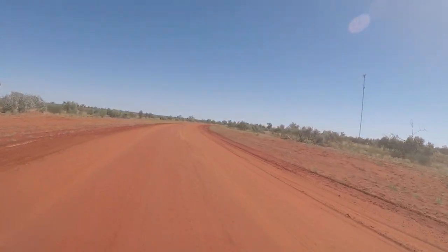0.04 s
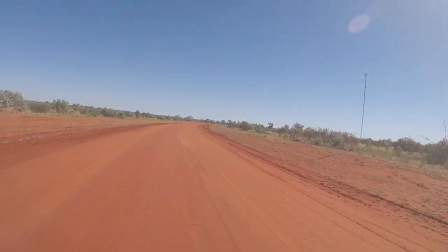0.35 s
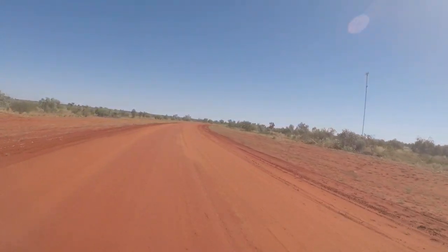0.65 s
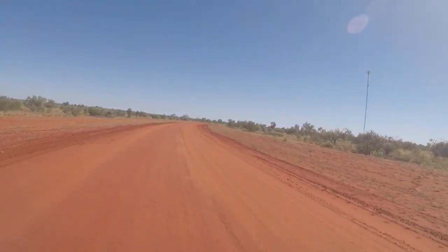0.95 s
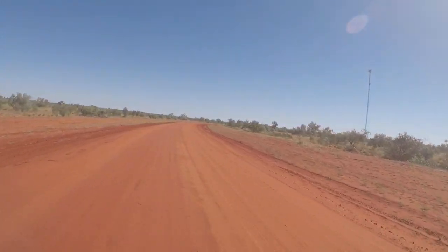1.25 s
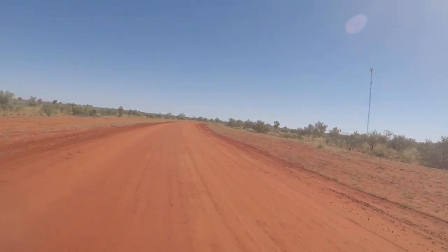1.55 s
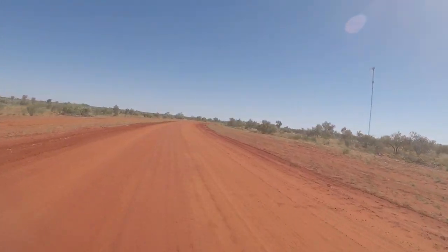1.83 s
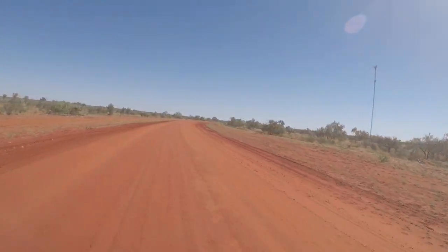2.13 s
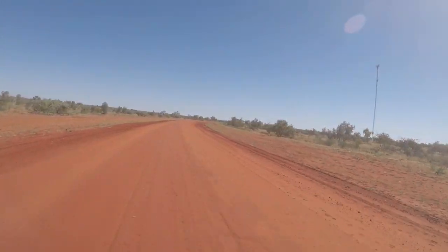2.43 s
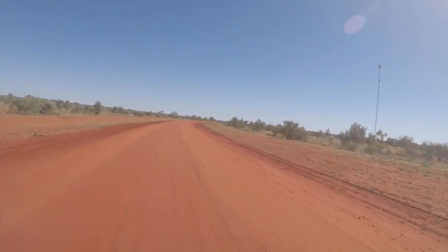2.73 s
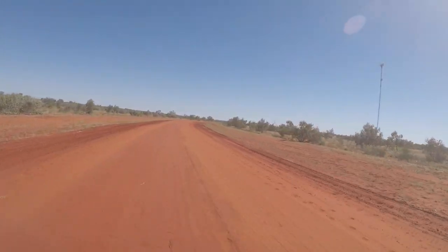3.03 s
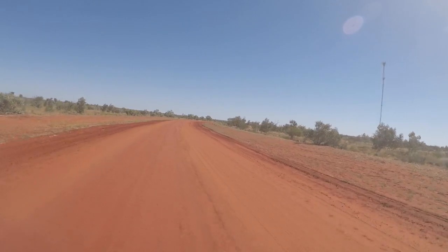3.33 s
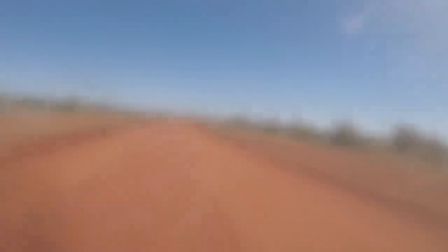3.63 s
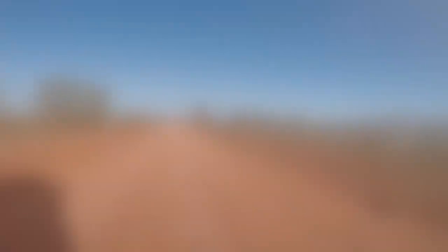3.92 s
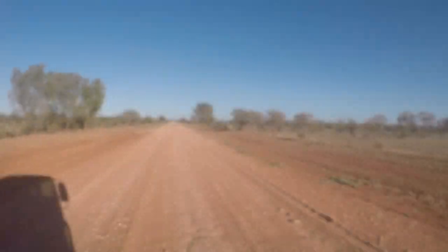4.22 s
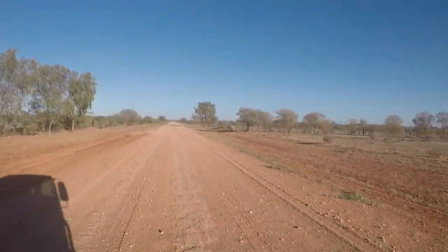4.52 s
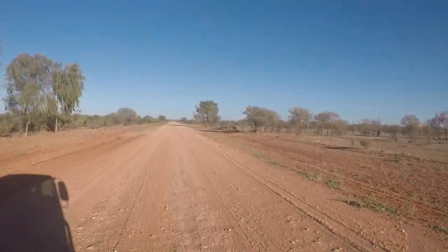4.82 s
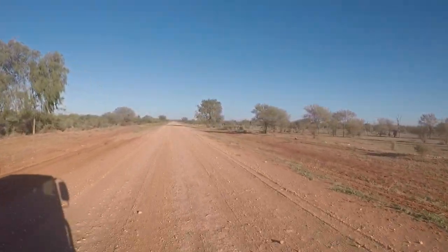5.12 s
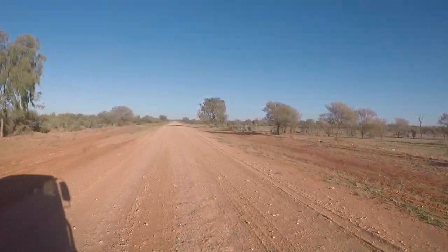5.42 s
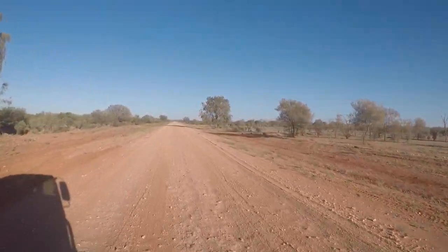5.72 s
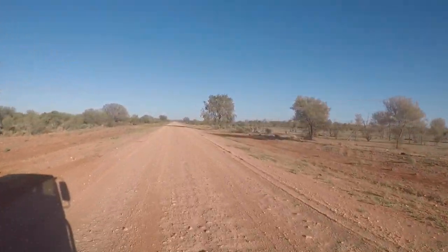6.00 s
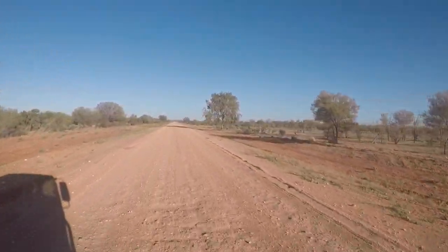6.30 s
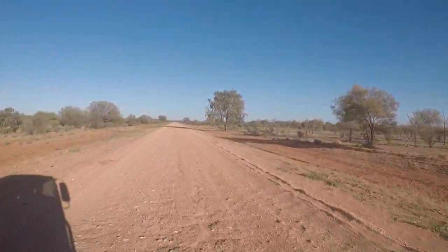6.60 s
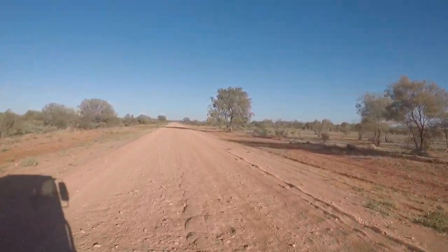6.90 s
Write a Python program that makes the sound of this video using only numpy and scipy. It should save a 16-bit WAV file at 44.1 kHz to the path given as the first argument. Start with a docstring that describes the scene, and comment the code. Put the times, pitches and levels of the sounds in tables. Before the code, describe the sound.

Deep, continuous tyre rumble and air rush from a vehicle driving on sand, then on gravel with bursts of rattling knocks.

```python
"""Four-wheel drive from sand to gravel

Heard from the front of the vehicle, first on smooth sand, then on corrugated gravel. The tyres shake
the body into a deep boom and a roar, air rushes past, a bar hums and the drivetrain whines faintly.
On the gravel a loose fitting knocks in bursts and grit ticks against the bodywork."""
import sys
import numpy as np
from scipy import signal
from scipy.fft import rfft, irfft, next_fast_len
from scipy.io import wavfile
from scipy.ndimage import uniform_filter1d, minimum_filter1d, map_coordinates

SR = 44100
rng = np.random.default_rng(int(sys.argv[2]) if len(sys.argv) > 2 else 0)


def master_out(mix):
    """Clip the mix to full scale and print it as 16-bit PCM to the path in sys.argv[1]."""
    frames = np.transpose(np.atleast_2d(mix))
    ceiling = np.clip(frames, -1, 1)
    pcm = np.round(ceiling * 32767).astype(np.int16)
    wavfile.write(sys.argv[1], SR, pcm)


N = 306495
NOW = np.arange(N) / SR
CENTRE = np.array([[1], [0]])  # sources are (mid, side) pairs

# how hard road and air work on the vehicle: time_s, level_db
RUSH = [(0.0, -28.5), (0.71, -30), (1.66, -28.5), (2.09, -31.5), (2.92, -31.5), (3.52, -30.5), (4.1, -37),
        (5.07, -39), (5.98, -37), (6.21, -37), (6.81, -34.5), (6.95, -33.5)]
# rough patches of road: centre_s, half_length_s, rise_db
ROUGH_PATCHES = [(.03, 0.11, 3.5), (.48, 0.12, 3), (1.95, 0.035, 4.5), (2.53, 0.14, 5), (3.03, 0.1, 4.5),
                 (3.28, 0.061, 5.5), (6.55, 0.041, 4), (6.85, 0.14, 1.5)]
# jolts that knock the loose fitting: time_s, level_db, ring_db
KNOCKS = [(4.0916, -18.5, -1), (4.1668, -16.5, -15), (4.361, -11.5, -2.5), (4.4455, -15.5, -10),
          (4.7339, -16, 2), (4.78, -34, 6), (4.7924, -13, -20), (4.9907, -21, -10), (5.1252, -21, 3),
          (5.2073, -9, 0.5), (5.247, -26, -8), (5.2824, -21, -19), (5.4465, -27.5, 0), (5.4711, -16, -5),
          (5.5467, -13.5, -14), (5.6169, -18.5, 5), (5.9859, -19.5, -5), (6.0443, -22, 2),
          (6.0673, -9, 2.5), (6.127, -27, 6), (6.1465, -8.5, 1), (6.22, -16.5, -4), (6.3293, -16.5, 0),
          (6.4059, -7, 5), (6.4794, -13.5, -14), (6.7576, -8, 2), (6.8391, -13, -18), (6.9127, -23, 3)]


def amp(db):
    """Decibels to gain."""
    return 10 ** (np.asarray(db) / 20)


def along(points, hz):
    """Read (freq_hz, value) points on a log axis."""
    freqs, values = np.transpose(points)
    return np.interp(np.log(hz + 1), np.log(freqs + 1), values)


def curves(rows):
    """One automation curve for each column after the time."""
    times, *columns = np.transpose(rows)
    return [np.interp(NOW, times, column) for column in columns]


def swells(rows):
    """Bell-shaped swells from (centre_s, half_length_s, height) rows."""
    return sum(height * np.exp(-.5 * ((NOW - s) / length) ** 2) for s, length, height in rows)


def wobble(rate):
    """A smooth random curve, rate knots a second."""
    return map_coordinates(rng.standard_normal(int(N * rate / SR) + 4), [NOW * rate])


def filtered(x, response):
    """Equalise x by a gain that depends on frequency."""
    size = next_fast_len(N + SR // 2)
    return irfft(rfft(x, size) * response(np.fft.rfftfreq(size, 1 / SR)), size)[..., :N]


def coloured(x, spectrum):
    """Give a pair this spectrum, rolled off beyond its ends; the mid has rms 1."""
    # stereo spread, side relative to mid: freq_hz, side_db
    spread = [(25, -24.5), (50, -19.5), (70, -6), (100, -17), (160, 1), (210, -1.5), (330, -8.5), (550, -4),
              (850, 5.5), (1500, -1.5), (2700, -4), (4200, -3.5), (5200, 1), (9000, 1)]
    lo, hi = spectrum[0][0], spectrum[-1][0]

    def response(hz):
        skirts = np.minimum(hz / lo, 1) ** 2 / np.maximum(hz / hi, 1) ** 4
        return skirts * amp(along(spectrum, hz) + [0 * hz, along(spread, hz)])

    pair = filtered(x, response)
    return pair / np.std(pair[0])


def noise(spectrum):
    """Mid and side noise with this spectrum."""
    return coloured(rng.standard_normal((2, N)), spectrum)


def grains(rate, spectrum):
    """Tiny impacts of random size, rate a second; each skitters briefly."""
    size_spread_db, skitter_s = 5, 0.0015
    energy = (rng.random(N) < rate / SR) * amp(size_spread_db * rng.standard_normal(N)) ** 2
    skitter = signal.lfilter([1], [1, -np.exp(-2 / (skitter_s * SR))], energy)
    return coloured(np.sqrt(skitter) * rng.standard_normal((2, N)), spectrum)


def tone(hz, db):
    """A centred sine of this pitch and rms level."""
    return np.sqrt(2) * amp(db) * np.sin(2 * np.pi * np.cumsum(hz) / SR) * CENTRE


def evened(vibration, evenness):
    """Even out the swings of a low vibration so its level holds steady; the mid has rms 1."""
    mid, side = vibration / np.std(vibration[0])
    envelope = np.abs(signal.hilbert(mid, next_fast_len(N)))[:N]
    swing = uniform_filter1d(envelope, size=SR // 30)
    mid = mid / (swing + 0.39) ** evenness
    return np.array([mid / np.sqrt(np.mean(mid ** 2)), side])


def on_road(sand, gravel):
    """Equal-power crossfade between the two surfaces."""
    # ground under the tyres: time_s, gravel_share
    surface = [(0, 0.05), (3.5, 0.1), (4.15, 0.88), (6.95, 0.89)]
    share, = curves(surface)
    return np.sqrt(1 - share) * sand + np.sqrt(share) * gravel


def effort():
    """The rush in dB above its average."""
    rush_db, = curves(RUSH)
    return rush_db - rush_db.mean()


def lurching():
    """Tyre load in dB: lurches press the tread into the gravel, rebounds lift it."""
    # lurches and rebounds: centre_s, rise_db
    lurches = [(4.25, -3.5), (4.42, 4), (4.65, -2.5), (4.77, 6.5), (4.92, 1.5), (5.05, -4.5), (5.2, -1),
               (5.52, 2.5), (5.7, -3.5), (5.88, -3.5), (6.089, 7.5), (6.41, 2), (6.8, -1.5)]
    half_length_s = 0.051
    return swells([(s, half_length_s, db) for s, db in lurches])


def chassis():
    """The road shakes the suspension and keeps the body rumbling under the booms."""
    # suspension shudder and body rumble on each surface: freq_hz, level_db
    shudder_eq = [(4, -18), (12, -10.5), (24, 1.5), (36, 1), (44, -20.5), (60, -32.5)]
    sand_eq = [(28, -21.5), (40, -1), (54, 2), (66, 0.5), (82, 1), (100, -13), (150, -41)]
    gravel_eq = [(28, -24), (42, -1.5), (56, -1), (72, -2.5), (82, -8.5), (100, -34), (150, -55)]
    shudder_db = -22.5 + 0.58 * (swells(ROUGH_PATCHES) + lurching()) + 2 * wobble(3)
    sand = amp(-17.5) * evened(noise(sand_eq), evenness=1)
    gravel = amp(-18) * evened(noise(gravel_eq), evenness=0.57)
    shudder = amp(shudder_db) * evened(noise(shudder_eq), evenness=0.93)
    body = shudder + on_road(sand, gravel) + booms()
    return np.std(body[0]) * evened(body, evenness=0.54)


def booms():
    """Each bump swells into a few cycles of deep body boom that sink in pitch."""
    # bumps and runs of corrugations: centre_s, half_length_s, pitch_hz, level_db
    bumps = [(0.182, .045, 55.7, -9.5), (0.552, .06, 60.4, -14.5), (0.767, 0.025, 52, -8.5),
             (1.005, .055, 47, -12), (1.144, 0.078, 73, -16.5), (1.409, 0.075, 57.6, -12),
             (1.736, 0.11, 50.1, -11), (2.049, 0.069, 57.8, -11), (2.228, 0.07, 54.3, -8),
             (2.552, 0.034, 61.5, -15.5), (2.92, 0.05, 40.3, -17), (3.082, 0.064, 56.2, -15.5),
             (3.409, 0.05, 52, -11.5), (3.581, 0.038, 44.3, -14.5), (3.84, 0.046, 62.4, -14.5),
             (4.177, 0.14, 62.4, -16), (4.506, 0.026, 59.1, -14), (4.652, 0.039, 65, -14.5),
             (4.791, 0.055, 62.7, -11), (5.022, .04, 59.4, -9.5), (5.158, 0.068, 57.5, -11.5),
             (5.468, .055, 62.6, -11), (5.619, .05, 63, -9), (5.76, .05, 60.3, -9.5),
             (5.921, .05, 61, -14.5), (6.056, 0.075, 47.4, -14), (6.295, 0.071, 58.7, -9.5),
             (6.419, 0.018, 64.5, -7.5), (6.7, .05, 58, -20.5), (6.851, 0.063, 64.3, -13)]
    sag_hz_per_s = 58
    total = np.zeros(N)
    for (s, length, hz, db), phase in zip(bumps, rng.random(len(bumps))):
        near = np.abs(NOW - s) < 5 * length
        t = NOW[near] - s
        cycles = phase + hz * t - .5 * sag_hz_per_s * t ** 2
        envelope = np.sqrt(2) * amp(db) * np.exp(-.5 * (t / length) ** 2)
        total[near] += envelope * np.sin(2 * np.pi * cycles)
    return total * CENTRE


def tyres():
    """Tread on dirt roars and drones through the panels; rough patches lift the drone."""
    # low drone and midrange roar on each surface: freq_hz, level_db
    sand_drone = [(60, -26), (88, 4), (130, 1), (165, -7.5), (200, -5.5), (250, -11.5), (380, -45.5)]
    gravel_drone = [(60, -37.5), (92, -1), (130, -2), (165, -6.5), (205, -3.5), (255, -9), (380, -43)]
    sand_roar = [(160, -36), (260, 3), (370, 1.5), (450, -1.5), (520, -1), (570, 1), (606, -3), (650, -6),
                 (900, -33)]
    gravel_roar = [(160, -27.5), (260, -1.5), (330, 6.5), (420, -6), (520, -5), (610, -8.5), (700, -22.5),
                   (900, -19)]
    rough_db = swells(ROUGH_PATCHES)
    drone_db = -23.5 + 0.37 * effort() + rough_db + 0.34 * wobble(13)
    roar_db = -27 + 0.56 * effort() + 0.062 * rough_db + 1.4 * wobble(18)
    drone = amp(drone_db) * on_road(noise(sand_drone), noise(gravel_drone))
    roar = amp(roar_db) * on_road(noise(sand_roar), noise(gravel_roar))
    return drone + roar


def air_rush():
    """Air and dust stream past and loose sand hisses, with a narrow dip in the treble."""
    # rush on each surface, and fine sand hiss: freq_hz, level_db
    sand_eq = [(500, -13.5), (700, -3.5), (900, -2), (1150, -5.5), (1500, -4), (2000, -8.5), (2700, -14.5),
               (3400, -18.5), (4400, -20.5), (5100, -25.5), (6000, -23), (7000, -29), (8500, -36.5),
               (14000, -54.5)]
    gravel_eq = [(500, 2), (700, 3.5), (900, -1), (1150, 0), (1550, -6), (2000, -7), (2700, -10),
                 (3400, -16.5), (4600, -20.5), (6000, -23.5), (7000, -24), (8500, -32.5), (11000, -42),
                 (14000, -53)]
    hiss_eq = [(4800, -14), (6000, 6), (7500, 0), (9000, -14.5), (11000, -44.5)]
    # hiss over a stretch of looser sand: time_s, level_db
    loose_sand = [(0, -80), (2, -60.5), (2.5, -54), (3.7, -53.5), (4.2, -73), (6.95, -78.5)]
    # the treble dip easing in: time_s, depth_share
    dip_depth = [(0, 0), (1.9, 0.2), (2.2, 0.16), (3.6, 0.2), (4.1, 0.2)]
    dip_hz, dip_width_hz = 5000, 370
    sand = amp(0.39 + 0.43 * wobble(25.28)) * noise(sand_eq)
    gravel = amp(-1 + lurching() + 1.7 * wobble(30)) * noise(gravel_eq)
    hiss = amp(curves(loose_sand)[0]) * noise(hiss_eq)
    air = amp(curves(RUSH)[0]) * on_road(sand, gravel) + hiss
    dip_band = filtered(air, lambda hz: np.exp(-.5 * ((hz - dip_hz) / dip_width_hz) ** 2))
    return air - curves(dip_depth)[0] * dip_band


def fitting_knocks():
    """The loose fitting strikes with a dry snap, and the road below returns an echo."""
    # modes of the fitting: pitch_hz, level_db, t60_s
    modes = [(870, -10, 0.013), (1150, -16.5, 0.034), (1390, -6.5, 0.015), (1780, -9, 0.012),
             (2490, -4.5, 0.0086), (2890, -5.5, 0.0073), (5550, -20, 0.0073), (6600, -20.5, 0.0031)]
    rise_s, echo_s, echo_db = 0.00066, 0.0096, -16.5
    hz, mode_db, t60 = np.transpose(modes)[:, :, None]
    ring_band = (hz > 2200) & (hz < 4000)
    t = np.arange(-SR // 200, SR // 20) / SR
    envelope = np.exp(np.minimum(t, 0) / rise_s) * amp(-60 * np.maximum(t, 0) / t60)
    clicks = np.zeros(N + SR)
    for s, db, ring_db in KNOCKS:
        # each contact has its own balance and tuning of the modes
        vary_db, detune = rng.standard_normal((2, len(hz), 1))
        partials = np.sin(2 * np.pi * hz * (1 + 0.017 * detune) * t)
        click = (amp(mode_db + ring_db * ring_band + vary_db) * envelope * partials).sum(0)
        click *= amp(db) / np.abs(click).max()
        clicks[round((s + t[0]) * SR):][:len(t)] += click
        clicks[round((s + t[0] + echo_s) * SR):][:len(t)] += amp(echo_db) * click
    mid = clicks[:N]
    side = .5 * np.gradient(mid) - .12 * mid  # a touch earlier on the left, louder on the right
    return np.array([mid, side])


def fitting_chatter():
    """The fitting chatters as it closes in on each knock and as it settles."""
    # colour of the chatter: freq_hz, level_db
    rattle_eq = [(400, -12), (800, -8.5), (1400, 0.5), (2100, -2.5), (2900, -3), (3800, -15), (4900, -18.5),
                 (6300, -13), (8000, -21.5), (11000, -44), (15000, -49)]
    closing_s, touch_s, settle_s, jiggle_s = 0.0021, 0.0038, 0.0069, 0.023
    envelope = np.zeros(N)
    for s, db, _ in KNOCKS:
        before, after = np.maximum(s - NOW, 0), np.maximum(NOW - s, 0)
        contact = amp(-28) * np.exp(-after / touch_s) + amp(-24) * np.exp(-after / settle_s)
        jiggle = amp(-30) * np.exp(-(before + after) / jiggle_s)
        envelope += amp(db) * (contact * np.exp(-before / closing_s) + jiggle)
    return envelope * amp(2.7 * wobble(300)) * noise(rattle_eq)


def grit():
    """Grit ticks on the bodywork and pebbles crackle underneath, louder in a lurch, spray or jolt."""
    # sprays of grit: centre_s, half_length_s, level_db
    sprays = [(4.342, 0.026, -48), (4.502, 0.086, -48), (4.806, 0.069, -48.5), (4.904, 0.0082, -51.5),
              (5.154, 0.011, -47), (5.797, 0.043, -52.5), (6.063, 0.027, -46.5), (6.13, 0.006, -40),
              (6.617, 0.07, -46), (6.736, 0.0064, -37), (6.812, 0.01, -40.5), (6.849, 0.012, -32),
              (6.89, 0.01, -41)]
    # colour of grit and of pebbles: freq_hz, level_db
    grit_eq = [(1500, -11), (3200, 3), (4300, -6.5), (6000, -4.5), (8000, -12), (11000, -25),
               (15000, -37.5)]
    pebble_eq = [(800, -2), (1500, 9.5), (2800, -1.5), (3800, -18), (6500, -10), (10000, -29)]
    crunch_s, crunch_db = 0.023, -30.5  # half length; level relative to the knock
    load_db = 0.45 * lurching() + 3 * wobble(25)
    scatter = amp(-59 + load_db) * grains(200, grit_eq)
    pebbles = amp(-48 + load_db) * grains(320, pebble_eq)
    crunch = swells([(s, crunch_s, amp(db + crunch_db)) for s, db, _ in KNOCKS]) * grains(320, pebble_eq)
    spray = swells([(s, length, amp(db)) for s, length, db in sprays]) * grains(3500, grit_eq)
    return spray + crunch + on_road(0, scatter + pebbles)


def bar_hum():
    """A bar hums in the turbulence, louder whenever it locks on to the airstream."""
    # spells of lock-on: start_s, end_s, rise_db
    holds = [(0, .52, 9.5), (.52, 1.05, 4.5), (1.85, 2.3, 7), (2.83, 3.24, 12)]
    pitch_hz, ramp_s = 334, .04
    lock_db = sum(db * (np.tanh((NOW - start) / ramp_s) - np.tanh((NOW - end) / ramp_s)) / 2
                  for start, end, db in holds)
    level_db = -40.5 + 0.91 * effort() + lock_db + 1.1 * wobble(12)
    return tone(pitch_hz + 0.61 * wobble(13), level_db)


def rut_growl():
    """The tread growls across a rut, falling in pitch."""
    # path of the growl: time_s, pitch_hz, level_db
    growl = [(2.9, 218, -68), (3.0, 207, -19.5), (3.12, 183.6, -33), (3.3, 176, -22), (3.42, 170.3, -70)]
    hz, db = curves(growl)
    return tone(hz + 3 * wobble(40), db + 2 * wobble(30))


def clod_thud():
    """A clod lands one soft blow on the damped underbody."""
    start_s, level_db, pitch_hz, t60_s = 1.3045, -9.5, 540, 0.03
    t = np.maximum(NOW - start_s, 0)
    return amp(level_db - 60 * t / t60_s) * np.sin(2 * np.pi * pitch_hz * t) * CENTRE


def panel_ring():
    """A panel rings unsteadily, mostly on the sand."""
    # strength of the ring: time_s, level_db
    levels = [(0, -52), (.8, -44.5), (1.25, -29.5), (1.45, -39), (1.82, -34), (2.2, -41), (3.5, -38.5),
              (4.1, -44)]
    ring = tone(hz=601 + 10.94 * wobble(50), db=curves(levels)[0] + 3 * wobble(22))
    return on_road(ring, 0)


def drivetrain_whine():
    """The drivetrain whines faintly, a little higher on the gravel."""
    # note of the whine: time_s, pitch_hz
    pitches = [(0, 1450), (1.2, 1455), (3.7, 1455), (4.2, 1545), (6.95, 1548)]
    # strength of the whine: time_s, level_db
    levels = [(0, -37.5), (.65, -44.5), (1.3, -40.5), (2.1, -43), (2.5, -62), (3.6, -43.5), (4.2, -59),
              (5, -55.5), (6.95, -52)]
    return tone(curves(pitches)[0] + 2.2 * wobble(30), curves(levels)[0] + 2 * wobble(40))


def edge_whistle():
    """Air whistles faintly round an edge; fast pitch jitter makes it breathy."""
    # path of the whistle: time_s, pitch_hz, level_db
    whistle = [(0, 4340, -71), (.7, 4640, -52), (1, 4020, -55), (1.2, 4580, -47), (1.4, 4010, -62),
               (1.7, 4720, -51), (2.2, 4297, -67), (2.8, 4450, -64), (3.4, 4470, -54.5), (3.8, 4730, -52.5),
               (4.2, 4620, -83)]
    hz, db = curves(whistle)
    return tone(hz + 190 * wobble(600), db)


def scene():
    """The whole vehicle: mono at first, then wide and leaning right."""
    # stereo width: time_s, side_share
    width = [(0, 0), (1.85, 0), (2.1, .3), (2.5, .53), (3, .7), (4.1, 1), (6.95, 1)]
    mix = chassis() + tyres() + air_rush()
    mix += bar_hum() + panel_ring() + drivetrain_whine() + edge_whistle() + rut_growl()
    mix += clod_thud() + fitting_knocks() + fitting_chatter() + grit()
    mid, side = mix
    lean_right = on_road(sand=.02, gravel=.075)
    side = (side - lean_right * mid) * curves(width)[0]
    return np.array([mid + side, mid - side])


def record(dry):
    """A limiter holds the highest peaks, then a steep low-pass cuts the extreme treble."""
    ceiling, top_hz, window = .86, 15400, SR // 100
    needed = np.minimum(1, ceiling / (np.abs(dry).max(0) + 1e-9))
    gain = uniform_filter1d(minimum_filter1d(needed, size=window), size=window)
    fade = signal.windows.tukey(N, .001)
    return filtered(dry * gain * fade, lambda hz: hz < top_hz)


dry = scene()
out = record(dry)
master_out(out)
```